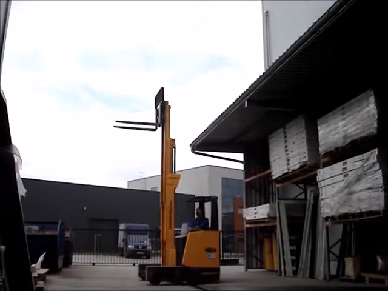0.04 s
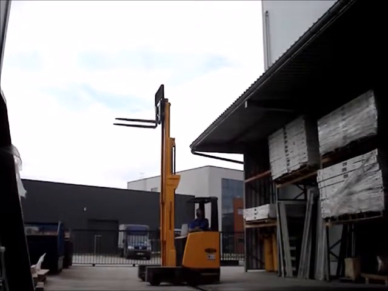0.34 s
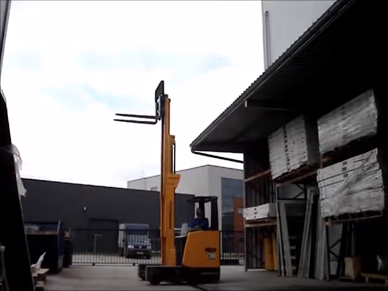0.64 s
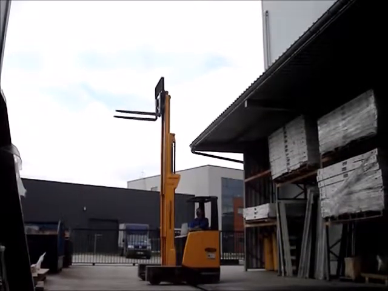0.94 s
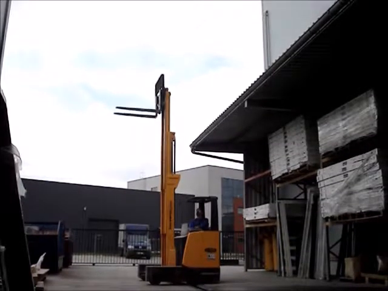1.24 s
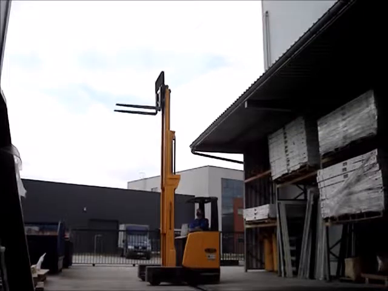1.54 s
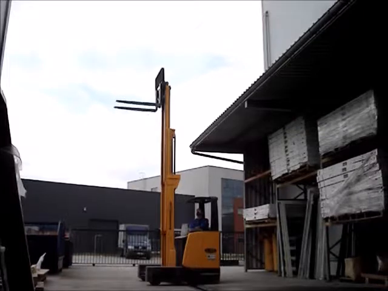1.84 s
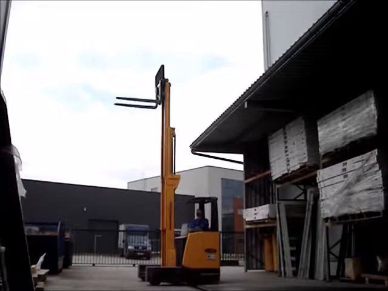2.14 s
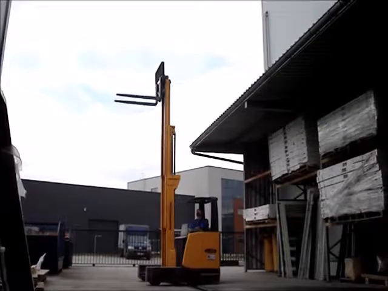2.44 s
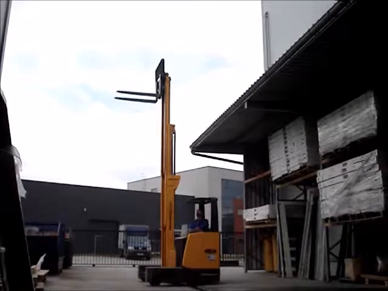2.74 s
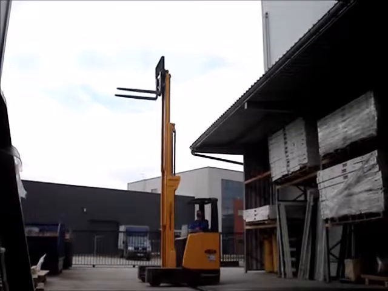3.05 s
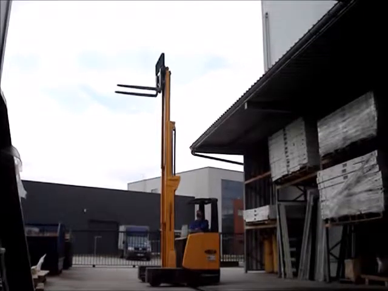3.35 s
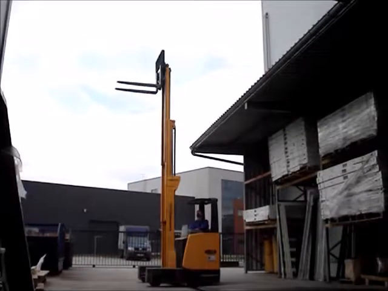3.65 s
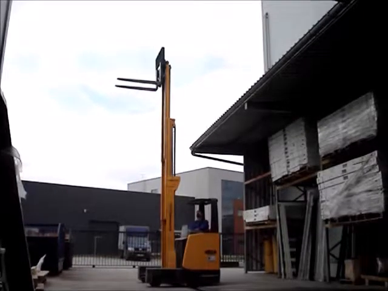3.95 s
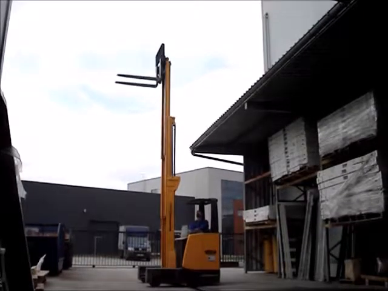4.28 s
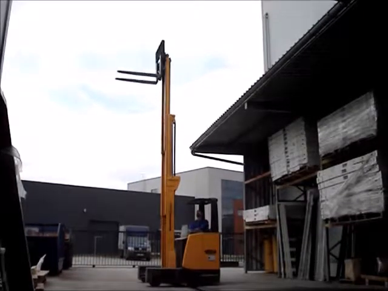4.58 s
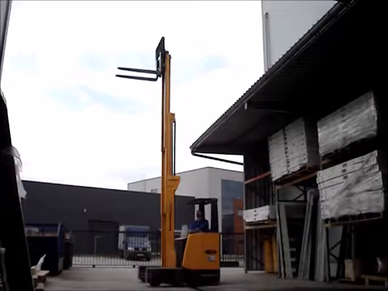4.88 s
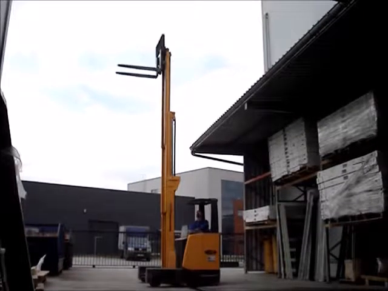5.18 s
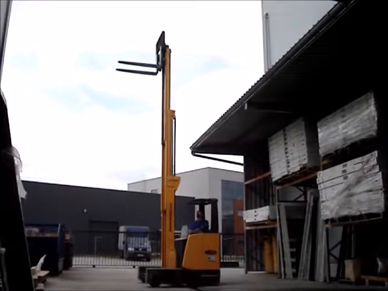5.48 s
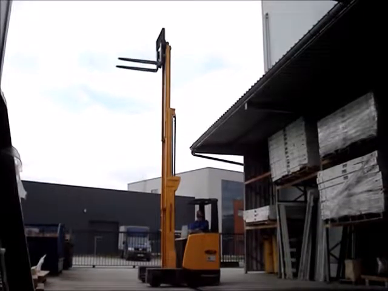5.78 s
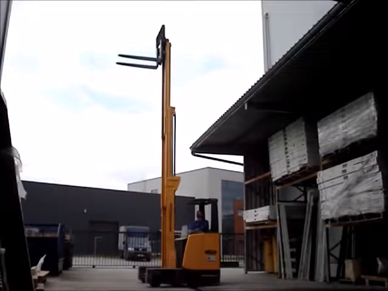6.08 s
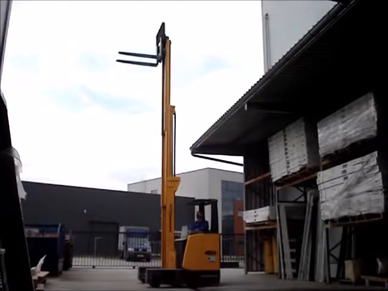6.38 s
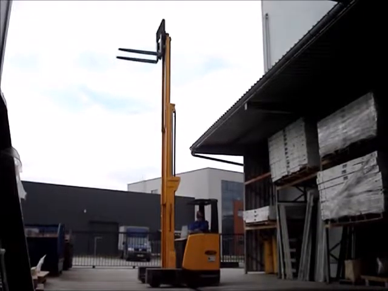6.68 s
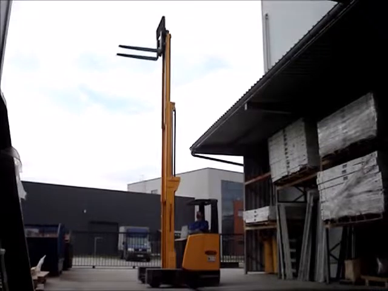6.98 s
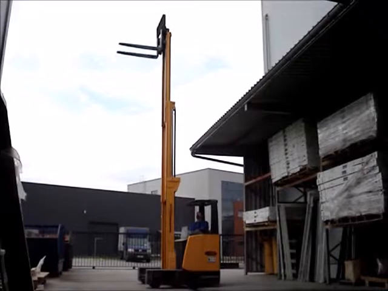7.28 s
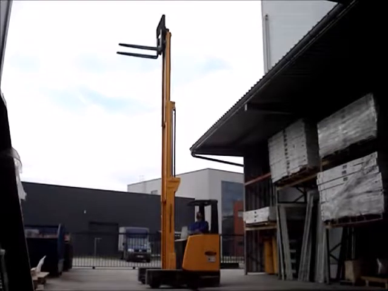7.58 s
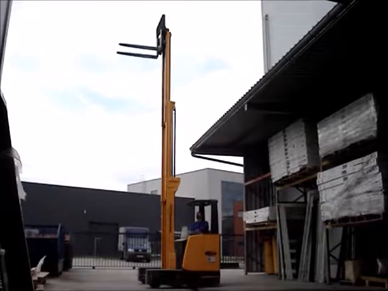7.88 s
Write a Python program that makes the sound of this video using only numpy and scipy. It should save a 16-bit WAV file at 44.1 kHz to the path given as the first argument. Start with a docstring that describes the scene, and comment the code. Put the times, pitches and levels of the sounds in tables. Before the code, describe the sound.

An electric forklift raises its mast in a warehouse yard, heard from some metres away. Its hydraulic pump and motor whine at a steady pitch over a rush of oil, with faint spells of thin buzzing, a small clunk and a soft rub of the rails. Near the end the mast hits its top stop with a loud, ringing steel clatter. The whine dies and a valve hisses.

```python
"""A warehouse yard, a small camera's microphone some metres from an electric reach truck raising its mast.
The gear pump and its motor whine over rushing oil, with a thin buzz now and then and a rub of the rails.
Near the end the mast hits its top stop: carriage, forks and chains clatter and ring out across the yard,
the whine dies, and oil hisses through the relief valve."""
import sys
import numpy as np
from scipy import signal
from scipy.fft import rfft, irfft, next_fast_len
from scipy.io import wavfile
from scipy.ndimage import uniform_filter1d, minimum_filter1d

SR = 44100
rng = np.random.default_rng(int(sys.argv[2]) if len(sys.argv) > 2 else 0)


def unload_audio(sound):
    """Save the sound as a 16-bit wav file, at the path given as the first command line argument."""
    columns = np.transpose(np.atleast_2d(sound))
    # keep every value between -1 and 1, then stretch to whole-number steps
    steps = np.round(np.clip(columns, -1, 1) * 32767)
    wavfile.write(sys.argv[1], SR, steps.astype(np.int16))


N = 358312
T = np.arange(N) / SR
GEAR_TEETH, MOTOR_SLOTS = 13, 33

# the octave above the gear mesh tone: time_s, level_db
MESH_OCTAVE = [(0, -31.5), (.42, -32.5), (.72, -38.5), (1, -34.5), (1.5, -40), (2.9, -36.5), (4.45, -36.5),
               (4.8, -44), (4.97, -37.5), (5.53, -39), (5.8, -34), (7.2, -36)]
# high harmonics of the mesh: mesh_multiple, base_db, harshness_share
MESH_TREBLE = [(8, -59, .66), (9, -54, .63), (10, -53, .7), (12, -64, .71), (14, -65.5, .6)]
# the mesh harmonic that stands out as a whine: time_s, level_db
MESH_WHINE = [(0, -50.5), (.42, -50), (.65, -52.5), (2.6, -54), (2.95, -51), (3.2, -54), (3.9, -55),
              (5.25, -51.5), (5.75, -53.5), (6.22, -48.5), (6.65, -57.5), (6.95, -52), (7.2, -54)]
# the one that stands out as a whistle: time_s, level_db
MESH_WHISTLE = [(0, -47), (.07, -56), (.13, -43.5), (.24, -60), (.31, -45), (.39, -56), (.45, -47),
                (.72, -55), (.96, -48.5), (1.15, -55), (1.35, -51.5), (1.5, -56), (1.7, -52), (2.4, -58.5),
                (3.6, -62.5), (6.1, -57), (7.2, -59)]
# the motor's slot tone: time_s, level_db
SLOT_LEVEL = [(0, -39.5), (2.5, -38.5), (3.75, -36.5), (4.9, -39), (6.3, -38), (6.55, -43), (7.2, -40)]
# weaker tones of the shaft: shaft_multiple, level_db
SHAFT_TONES = [(9, -54.5), (11, -50), (24, -64.5), (25, -53.5), (27, -53.5), (28, -50), (35, -61.5),
               (39, -49), (40, -53), (41, -65.5), (52, -62), (65, -59), (66, -49.5), (74, -62.5), (75, -62),
               (78, -61), (99, -63.5), (120, -69.5), (122, -62.5), (125, -72.5), (165, -71), (249, -76)]
# steady hum of the truck: pitch_hz, level_db
TRUCK_HUM = [(126.5, -61), (293.5, -54.5), (300, -52), (315, -56.5)]
# rush of oil and cooling air: frequency_hz, relative_db
RUSH_SPECTRUM = [(25, -22), (90, -11.5), (128, -4), (165, -7), (220, -8.5), (255, 3), (330, -1.5), (430, 3),
                 (680, -4.5), (880, 1), (1300, -2), (1650, -11), (2500, -10), (2900, -10), (3500, -19),
                 (4000, -10.5), (5200, -20.5), (7100, -31.5), (8100, -31.5), (9100, -36), (9700, -30),
                 (10000, -34)]
# blows at the top stop, cushioned at first, then bare steel:
# start_s, force_db, rattle_decay_s, cutoff_hz, clank_hz, clank_db, clank_t60_s
STOP_BLOWS = [(7.283, -1, .0069, 610, 415, -18, 0.1), (7.298, -4, 0.021, 1300, 484, -19, .08),
              (7.31, -2.5, 0.068, 3100, 550, -15, 0.15), (7.33, -6, .01, 890, 478, -11, 0.13),
              (7.375, 1, 0.0018, 2600, 1153, -2, 0.035), (7.391, 1.5, 0.004, 4530, 2271, -6, .1),
              (7.4, 0.5, 0.019, 9450, 1020, -16, 0.11), (7.41, -5, 0.0083, 5500, 1068, -5.5, 0.079),
              (7.424, -10.5, 0.0089, 9000, 940, -13, 0.08), (7.447, -5.5, .005, 5000, 1002, -11, 0.11),
              (7.461, 0, 0.0076, 4800, 2260, -12, .08), (7.488, 0, 0.0069, 2980, 2220, -7, 0.13),
              (7.512, -1, 0.0041, 2620, 990, -8, 0.052), (7.543, -5, 0.016, 5000, 1404, -21, .08),
              (7.563, -4.5, 0.0061, 3600, 1026, -20, .08), (7.584, -8, 0.0035, 4000, 2330, -28, 0.073),
              (7.608, -6.5, 0.0073, 2600, 1030, -21, 0.064)]
# dense clatter of the steelwork: frequency_hz, relative_db
CLATTER_SPECTRUM = [(30, -41), (65, -36), (100, -21), (200, -20), (340, -9), (410, -3), (560, -3),
                    (760, -3), (1050, -1.5), (1750, -9.5), (2250, -5.5), (2800, -9.5), (4200, -10),
                    (5200, -8), (6500, -21), (8000, -33), (10000, -46)]
# ring of mast and forks: pitch_hz, relative_db, t60_s
STEEL_MODES = [(445, -6, 0.8), (560, -2, 1.03), (577, -6.5, 0.93), (722, -6.5, 1), (1001, 0.5, 0.61),
               (1035, -2, 0.52), (1187, -5.5, 0.53), (1235, -7, 1), (1389, -4, 0.87), (1450, -3.5, 1),
               (1552, -2.5, 1), (1870, -6, .8), (1892, -3.5, 0.92), (2126, -2.5, .84), (2193, -0.5, 0.97),
               (2280, -5, 0.57), (2280, -2.5, 1), (2635, -3.5, .55), (2920, -10, .8), (3140, -10.5, .8),
               (3740, -7, .5), (3860, -3.5, 0.45), (4450, -8.5, 0.51), (4830, -9, 0.59), (4950, -6, 0.44),
               (5141, -1.5, 0.43)]
# jolts of mast and chassis: start_s, pitch_hz, level_db, t60_s
JOLTS = [(1.914, 490, -25.5, 0.13), (1.928, 585, -38, 0.53), (1.972, 308, -32.5, .15),
         (1.975, 490, -35, 0.44), (7.283, 104.5, -23, 0.22), (7.299, 210, -22, 0.3), (7.32, 146, -19, 0.19),
         (7.332, 289, -11, 0.2), (7.38, 106, -21, .17), (7.39, 195, -26, 0.28), (7.396, 546, -3, 0.088),
         (7.425, 497, -10, 0.066), (7.445, 280, -20.5, 0.14), (7.511, 563, -12.5, 0.14)]
# hiss of the relief valve: time_s, level_db
VALVE_LEVEL = [(7.3, -67.5), (7.6, -56), (7.8, -35), (7.93, -30.5), (8.12, -31)]
# colour of that hiss: frequency_hz, relative_db
VALVE_SPECTRUM = [(100, -32.5), (200, -20), (300, -5.5), (750, 2), (1700, -1), (3000, 0.5), (4500, 3),
                  (5300, -2.5), (6000, -13), (6900, -14.5), (8500, -34), (10000, -38)]
# the strained hydraulics sing: peak_s, spread_s, pitch_hz, level_db
PIPE_GROANS = [(7.734, 0.081, 280.7, -33.5), (7.848, 0.18, 1255, -39.5), (7.945, 0.083, 822, -38.5),
               (8.02, 0.19, 281, -46.5), (8.096, 0.038, 702, -32.5)]
# spells of thin buzz: start_s, end_s, level_db
BUZZ_SPELLS = [(.42, .76, -54), (.78, .84, -58), (1.82, 2.155, -55), (2.192, 2.48, -54),
               (2.493, 2.616, -59), (2.75, 3.05, -66), (3.08, 3.329, -55.5)]
# brief ring of each tick in the buzz: centre_hz, width_hz
TICK_BANDS = [(5750, 520), (6420, 520)]
# rubs and squeaks of the mast rails: peak_s, spread_s, centre_hz, width_hz, level_db
RAIL_RUBS = [(1.91, 0.011, 4700, 600, -43.5), (3.262, .006, 5780, 110, -53), (3.99, 0.25, 1360, 257, -46),
             (4.08, 0.14, 2140, 159, -48.5)]


def pump(turns, mesh_db=-37.5, treble_sway_db=1.9, treble_rough=.16, settle_s=1.8):
    """Meshing gear teeth sound a stack of harmonics; pressure ripple roughens them."""
    mesh = GEAR_TEETH * turns
    octave_db = curve(MESH_OCTAVE)
    gears = tone(mesh, mesh_db + .4 * walk(4.6), rough=.21, rate_hz=25)
    gears += tone(2 * mesh, octave_db, rough=.12)
    # harsh at first, settling as the mast rises; the harshness also follows the octave's level
    harsh_db = -14 + 10 * np.exp(-T / settle_s) + .3 * (octave_db - octave_db.mean())
    for multiple, base_db, share in MESH_TREBLE:
        level_db = base_db + share * (harsh_db + treble_sway_db * walk(5.5))
        gears += tone(multiple * mesh, level_db, treble_rough)
    for multiple, levels in ((7, MESH_WHINE), (11, MESH_WHISTLE)):
        gears += tone(multiple * mesh, curve(levels) + treble_sway_db * walk(9), treble_rough)
    return gears


def motor(turns):
    """The motor's slots sing at a multiple of the shaft rate, among weaker shaft harmonics."""
    slots = tone(MOTOR_SLOTS * turns, curve(SLOT_LEVEL), rough=.14)
    return slots + sum(tone(multiple * turns, db, rough=.21, rate_hz=20) for multiple, db in SHAFT_TONES)


def shaft(mesh_hz=424.25, drift_hz=.2983):
    """Turns made by the governed pump shaft: a steady speed with a slight drift."""
    return np.cumsum(mesh_hz + drift_hz * walk(4)) / GEAR_TEETH / SR


def rush(turns, midband_db=-50.5, throb=.22, unsteady_db=1.23):
    """Oil and cooling air rush, throbbing twice a turn of the shaft."""
    flow = walls(colour(rng.standard_normal(N), RUSH_SPECTRUM), ripple_db=.44)
    flow *= (1 + throb * np.sin(4 * np.pi * turns)) * undb(unsteady_db * walk(14))
    midband = band(flow, 1400, 2050, order=6)
    return flow / np.std(midband) * undb(midband_db)


def top_stop(clatter_gain_db=20.5, grain_db=2.0, settle_s=.098):
    """Each blow is a cluster of chain and carriage contacts with the short clank of the part it hits."""
    t, force, out = T[:SR // 4], np.zeros(N), np.zeros(N)
    for start_s, force_db, decay_s, cutoff_hz, clank_hz, clank_db, t60_s in STOP_BLOWS:
        contacts = rng.standard_normal(len(t)) * undb(grain_db * rng.exponential(size=len(t)))
        rattle = unit(contacts * np.exp(-t / decay_s)) / np.sqrt(len(t))
        softness = signal.butter(2, cutoff_hz, fs=SR, output="sos")
        add(force, start_s, undb(force_db) * signal.sosfilt(softness, rattle))
        add(out, start_s, struck(clank_hz, clank_db, t60_s, push_s=.00083))
    first_s, last_s = STOP_BLOWS[0][0], STOP_BLOWS[-1][0]
    # the slack chain goes on tapping, ever more lightly
    for wait_s, size in rng.random((14, 2)) * [.4, 1]:
        tap = undb(-21) * (.5 + size) * np.exp(-wait_s / settle_s)
        add(force, last_s + wait_s, np.array([tap]))
    force = force[int(first_s * SR):]
    add(out, first_s, undb(clatter_gain_db) * signal.fftconvolve(force, steelwork()))
    add(out, first_s, ring(force))
    return out


def steelwork(crack_t60_s=.068, yard_t60_s=1.14, yard_db=-4):
    """One tap on the steel as it reaches the microphone: a short crack, then the yard's reverberation."""
    crack = rng.standard_normal(SR) * fade(crack_t60_s)
    yard = rng.standard_normal(SR) * fade(yard_t60_s) * (1 - np.exp(-T[:SR] / .0067))
    tap = np.pad(unit(crack) + undb(yard_db) * unit(yard), (0, SR))
    return unit(colour(tap, CLATTER_SPECTRUM)[:SR]) / np.sqrt(SR)


def ring(force, gain_db=-33):
    """The modes of mast and forks, topped up by every blow; their ring stays between about 380 Hz and 6 kHz."""
    modes = np.zeros(len(force))
    for hz, db, t60_s in STEEL_MODES:
        pole = np.exp((2j * np.pi * hz - np.log(1000) / t60_s) / SR)
        modes += undb(gain_db + db) * unit(signal.lfilter([1], [1, -pole], force).imag)
    return band(modes, 380, 6000, order=3)


def thumps():
    """Mast and chassis clunk, once as the stages slide and then at the stop."""
    out = np.zeros(N)
    for start_s, hz, db, t60_s in JOLTS:
        add(out, start_s, struck(hz, db, t60_s, push_s=.0021))
    return out


def relief_valve(waver_rad=.65, flutter_db=3.0, sputter_db=2):
    """With the ram at its end, oil sputters through the relief valve and the pipes sing."""
    flow = unit(walls(colour(rng.standard_normal(N), VALVE_SPECTRUM), ripple_db=4.0))
    edges_hz = np.geomspace(100, 10000, 13)
    hiss, song = np.zeros(N), np.zeros(N)
    for lo_hz, hi_hz in zip(edges_hz, edges_hz[1:]):
        hiss += band(flow, lo_hz, hi_hz, order=1) * undb(sputter_db * walk(45))
    for peak_s, spread_s, hz, db in PIPE_GROANS:
        envelope = np.sqrt(2) * undb(db + flutter_db * walk(35)) * swell(peak_s, spread_s)
        song += envelope * np.sin(2 * np.pi * hz * T + waver_rad * walk(40))
    return unit(hiss) * undb(curve(VALVE_LEVEL) + walk(30)) + song


def buzz(rate_hz=60, echo_s=.0029, echo_db=-8, weak_db=-7):
    """Thin electrical ticking: one ringing tick a cycle, strong and weak in turn, with a close echo."""
    spells = sum(undb(db) * ((T > start_s) & (T < end_s)) for start_s, end_s, db in BUZZ_SPELLS)
    cycle = np.arange(int(T[-1] * rate_hz) - 1)
    uneven_db = 4.5 * np.clip(rng.standard_normal(len(cycle)), -2, 1)
    size = undb(weak_db * (cycle % 2) + uneven_db)
    tick_s = cycle / rate_hz + .0041 + .00045 * rng.random(len(cycle))
    return_s = tick_s + echo_s * (1 + .3 * rng.random(len(cycle)))
    ticks, rung = np.zeros(N), np.zeros(N)
    ticks[(tick_s * SR).astype(int)] = size
    ticks[(return_s * SR).astype(int)] += undb(echo_db) * size
    for k, (hz, width_hz) in enumerate(TICK_BANDS):
        rung += (-1) ** k * band(ticks, hz - width_hz / 2, hz + width_hz / 2, order=1)
    return unit(rung) * spells


def rails():
    """Soft scrapes of the mast rails as they slide."""
    out = np.zeros(N)
    for peak_s, spread_s, hz, width_hz, db in RAIL_RUBS:
        scrape = unit(band(rng.standard_normal(N), hz - width_hz / 2, hz + width_hz / 2))
        out += undb(db) * swell(peak_s, spread_s) * scrape
    return out


def hum(stray=.54):
    """The truck's low hum sits under the pump, wavering in level and phase."""
    out = np.zeros(N)
    for hz, db in TRUCK_HUM:
        envelope = np.sqrt(2) * undb(db) * (1 + stray * walk(11))
        out += envelope * np.sin(2 * np.pi * hz * T + stray * walk(6.5))
    return out


def walls(x, ripple_db):
    """Reflections in the yard comb a steady noise into fine peaks and dips, fading in the top treble."""
    hz = np.arange(200, 10000, 14)
    depth = np.interp(hz, [200, 214, 5000, 8000], [0, 1, 1, 0])
    return colour(x, np.column_stack([hz, ripple_db * depth * rng.standard_normal(len(hz))]))


def tone(cycles, db, rough, rate_hz=30):
    """A sine that follows a count of cycles, wavering in level and phase."""
    phase = 2 * np.pi * (cycles + rng.random())
    wave = (1 + rough * walk(rate_hz)) * np.sin(phase) + rough * walk(rate_hz) * np.cos(phase)
    return np.sqrt(2) * undb(db) * wave


def struck(hz, db, t60_s, push_s):
    """One mode set ringing by a short, smooth push."""
    t = T[:SR]
    attack = 1 - np.exp(-(t / push_s) ** 2)
    return undb(db) * attack * np.sin(2 * np.pi * hz * t) * fade(t60_s)


def fade(t60_s):
    """One second of decay, falling 60 dB in t60_s."""
    return np.exp(-np.log(1000) * T[:SR] / t60_s)


def swell(peak_s, spread_s):
    """A bell-shaped rise and fall."""
    return np.exp(-.5 * ((T - peak_s) / spread_s) ** 2)


def walk(rate_hz):
    """Smooth random wander, rms 1."""
    step = int(SR / rate_hz)
    return unit(uniform_filter1d(np.repeat(rng.standard_normal(N // step + 1), step), step)[:N])


def curve(table):
    """A table of time_s, level_db as one level a sample."""
    return np.interp(T, *np.transpose(table))


def colour(x, points):
    """Filter by a spectrum of frequency_hz, gain_db points."""
    hz, db = np.transpose(points)
    size = next_fast_len(len(x))
    bins_hz = np.arange(size // 2 + 1) * SR / size
    gain = undb(np.interp(np.log(bins_hz + 1), np.log(hz), db))
    return irfft(rfft(x, size) * gain, size)[:len(x)]


def band(x, lo_hz, hi_hz, order=2):
    """Band-pass filter."""
    return signal.sosfilt(signal.butter(order, [lo_hz, hi_hz], "band", fs=SR, output="sos"), x)


def add(out, start_s, x):
    """Mix x in from start_s."""
    i = int(start_s * SR)
    out[i:i + len(x)] += x[:N - i]


def undb(db):
    """Decibels to gain."""
    return 10 ** (np.asarray(db) / 20)


def unit(x):
    """Scale to rms 1."""
    return x / np.sqrt(np.mean(x ** 2))


def scene(stop_s=7.36, stall_s=.15):
    """From some metres off, in mono: the lift runs freely until the stop stalls it."""
    turns = shaft()
    lifting = np.clip(1 - (T - stop_s) / stall_s, 0, 1)
    drive = (pump(turns) + motor(turns) + hum()) * lifting
    return (drive + rush(turns) + top_stop() + thumps() + relief_valve() + buzz() + rails())[None]


def record(dry, ceiling=.79, hold_s=.0028, top_hz=10000):
    """Behind the microphone, the camera's limiter holds down the loudest peaks; the top treble is cut."""
    hold = int(hold_s * SR)
    needed_gain = ceiling / np.maximum(np.abs(dry), ceiling)
    gain = uniform_filter1d(minimum_filter1d(needed_gain, hold), hold)
    return signal.sosfilt(signal.ellip(12, .2, 80, top_hz, fs=SR, output="sos"), dry * gain)


dry = scene()
out = record(dry)
unload_audio(out)
```